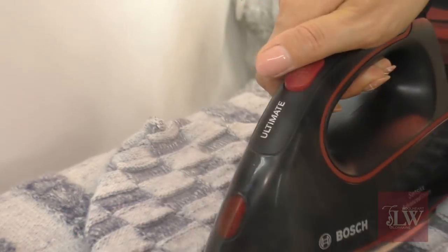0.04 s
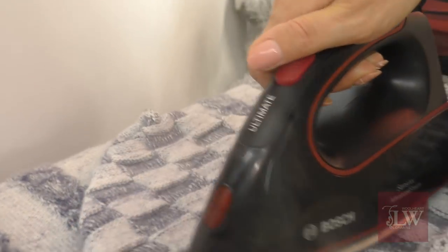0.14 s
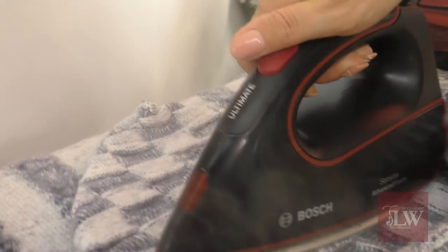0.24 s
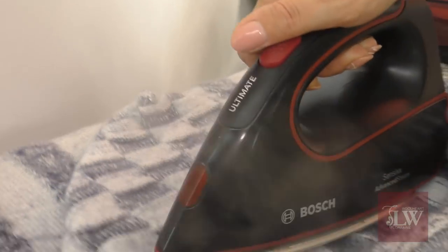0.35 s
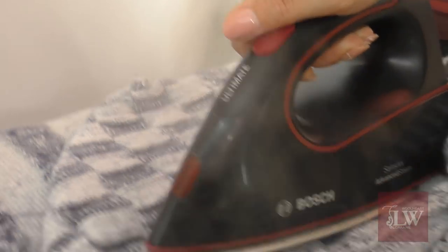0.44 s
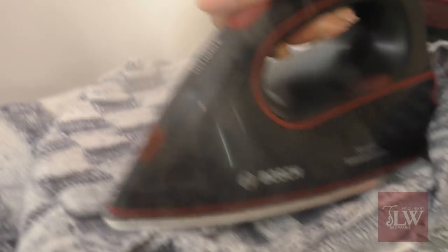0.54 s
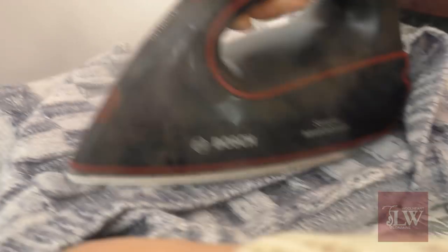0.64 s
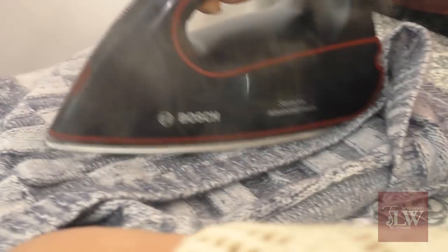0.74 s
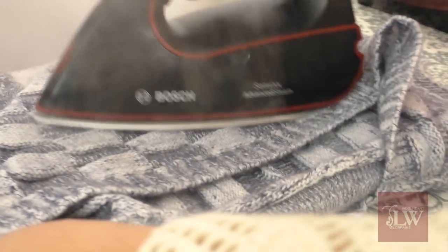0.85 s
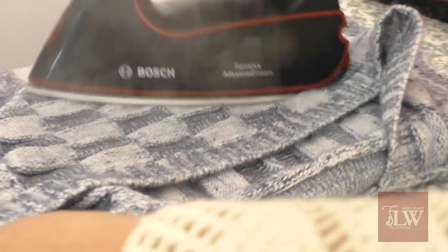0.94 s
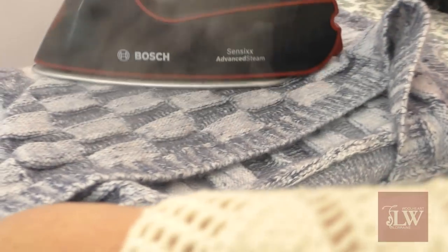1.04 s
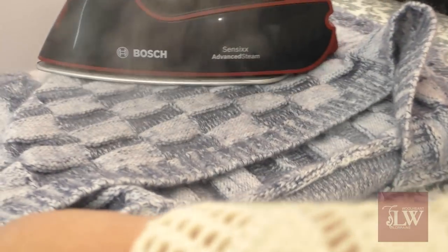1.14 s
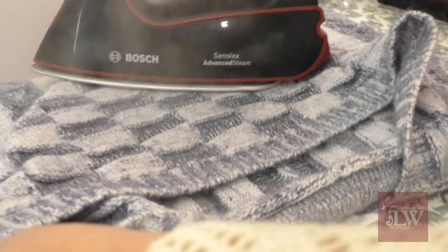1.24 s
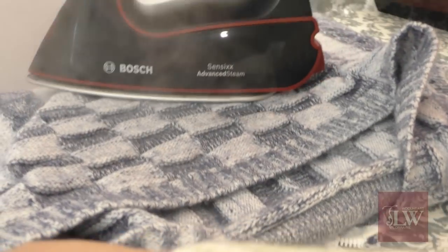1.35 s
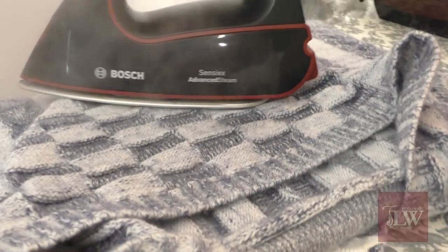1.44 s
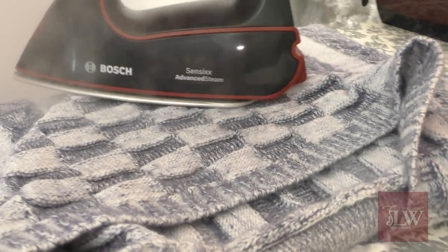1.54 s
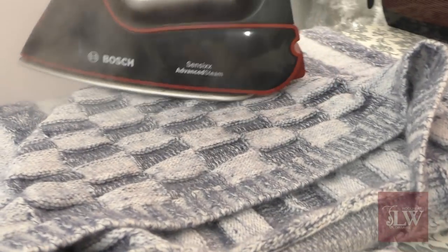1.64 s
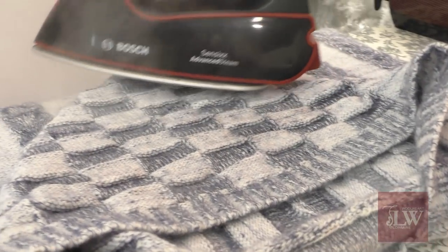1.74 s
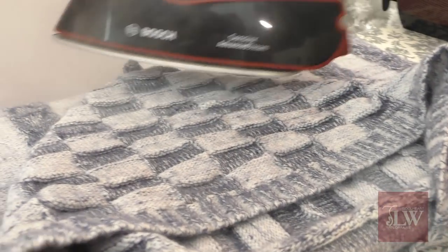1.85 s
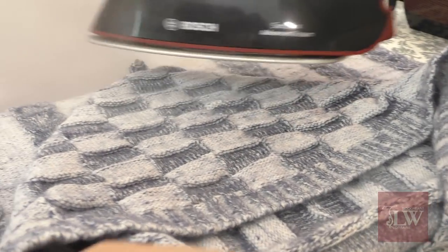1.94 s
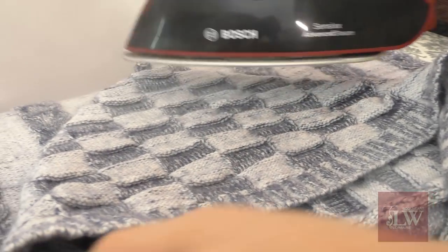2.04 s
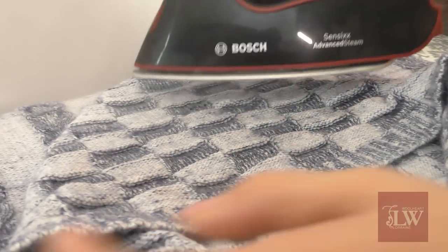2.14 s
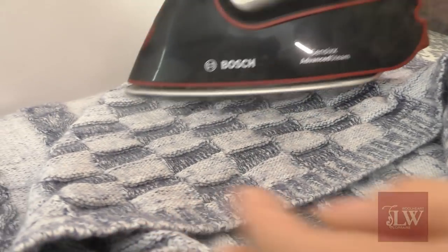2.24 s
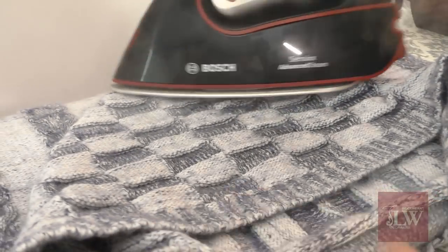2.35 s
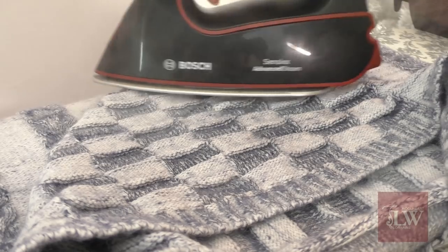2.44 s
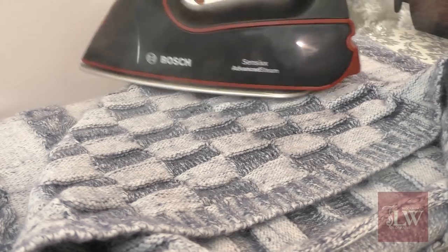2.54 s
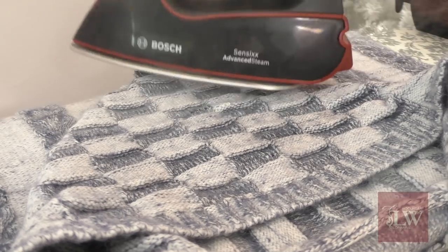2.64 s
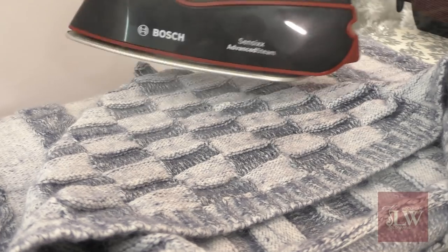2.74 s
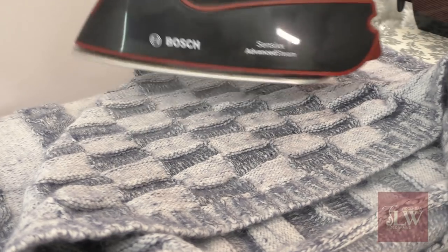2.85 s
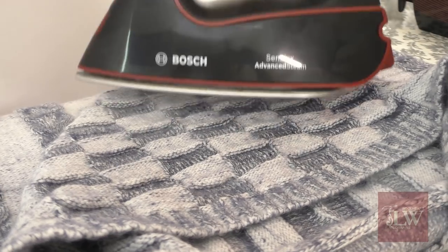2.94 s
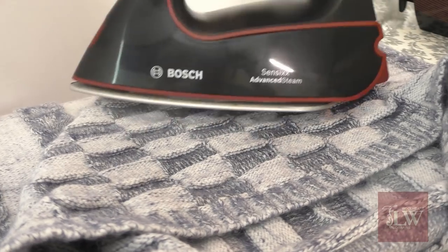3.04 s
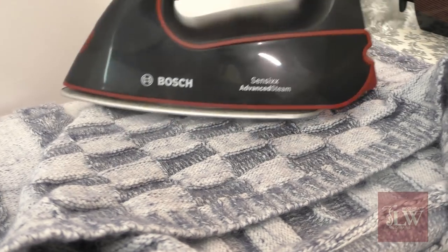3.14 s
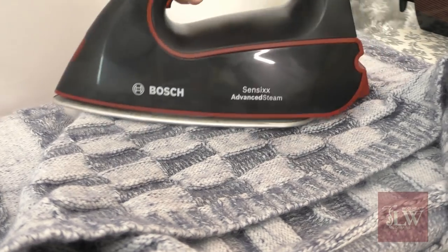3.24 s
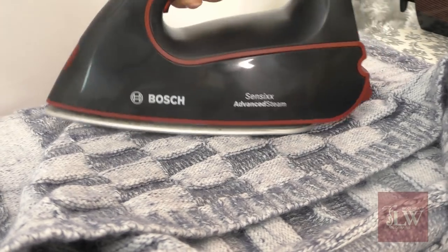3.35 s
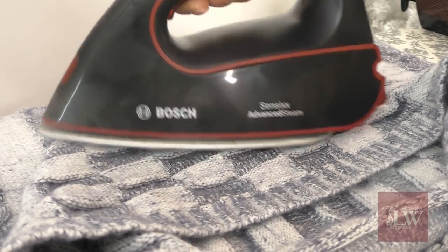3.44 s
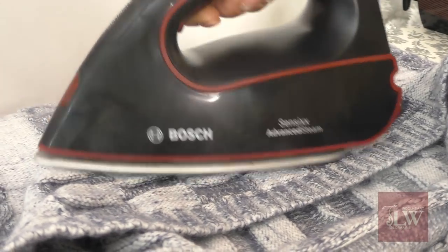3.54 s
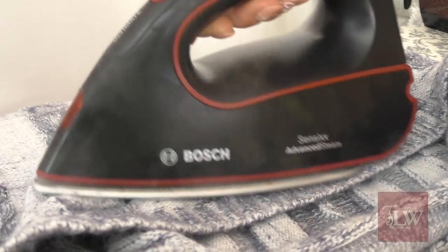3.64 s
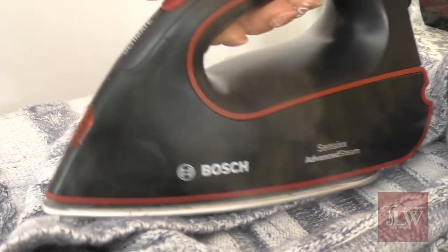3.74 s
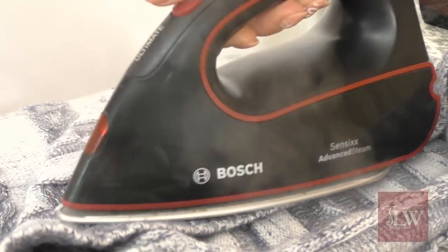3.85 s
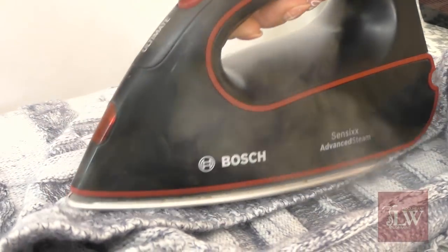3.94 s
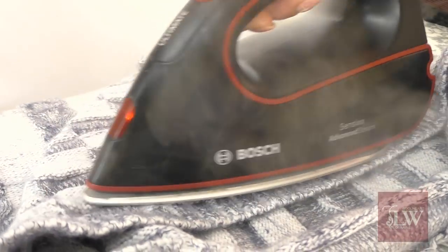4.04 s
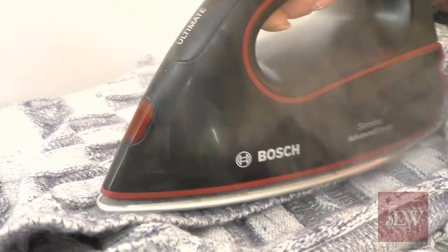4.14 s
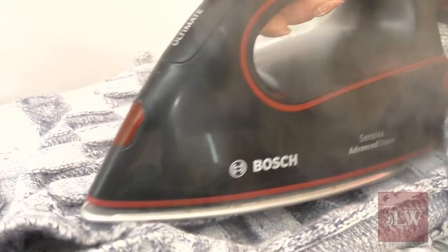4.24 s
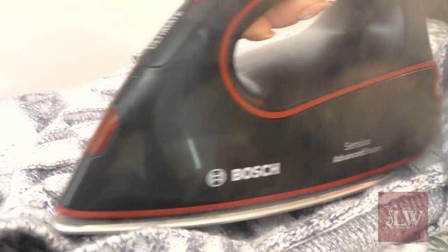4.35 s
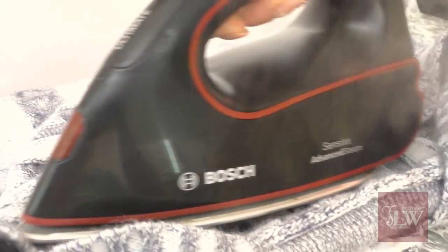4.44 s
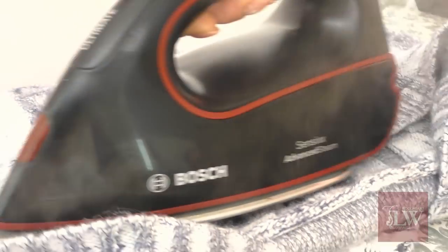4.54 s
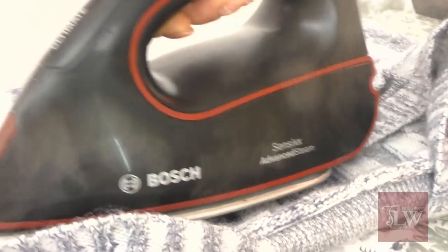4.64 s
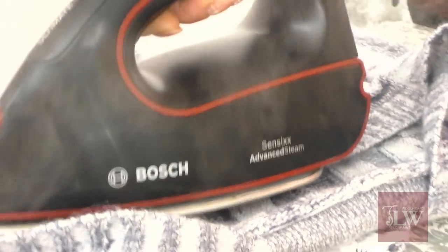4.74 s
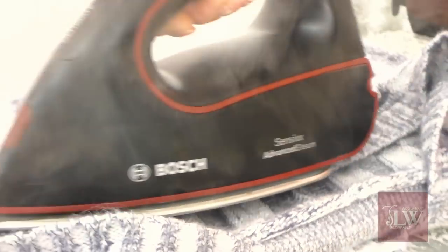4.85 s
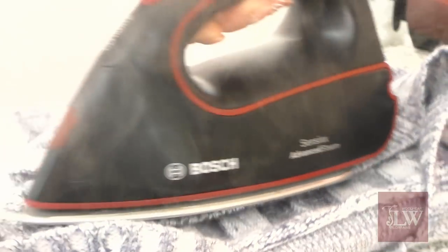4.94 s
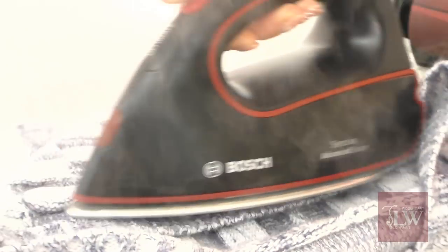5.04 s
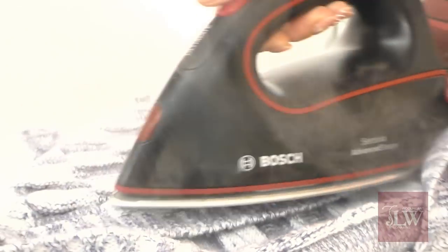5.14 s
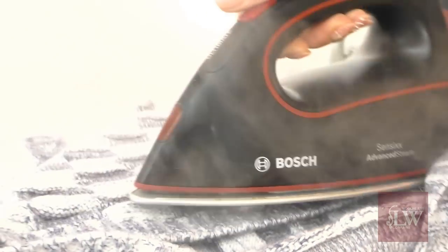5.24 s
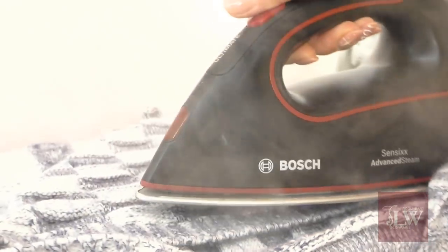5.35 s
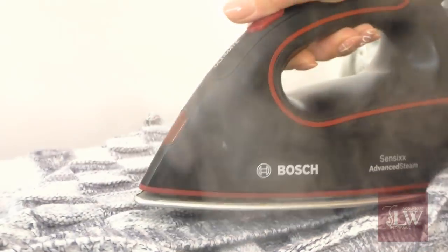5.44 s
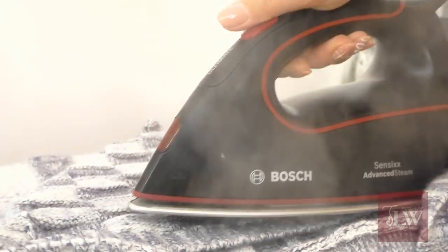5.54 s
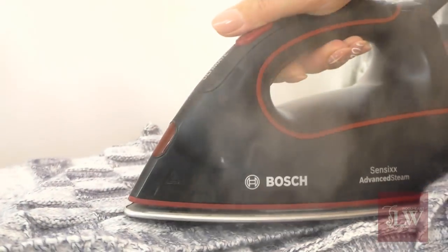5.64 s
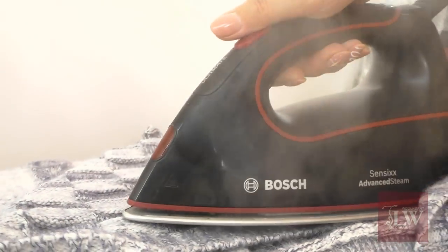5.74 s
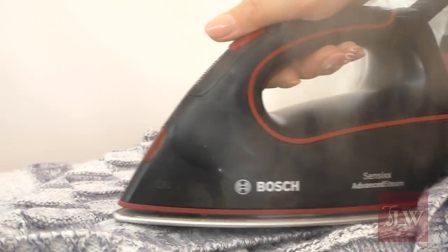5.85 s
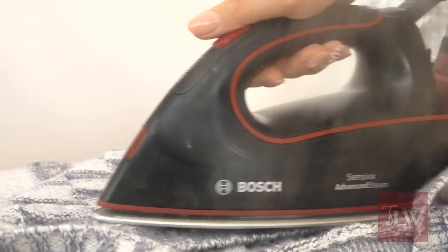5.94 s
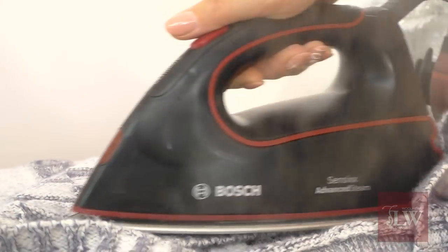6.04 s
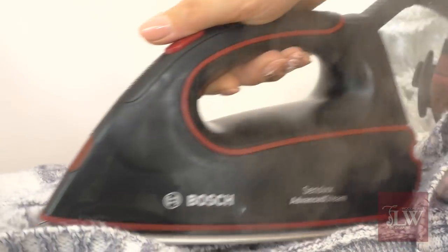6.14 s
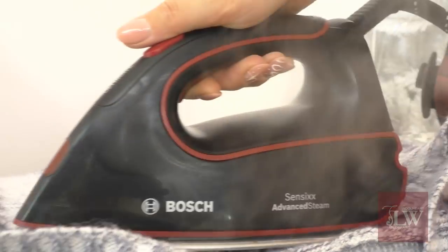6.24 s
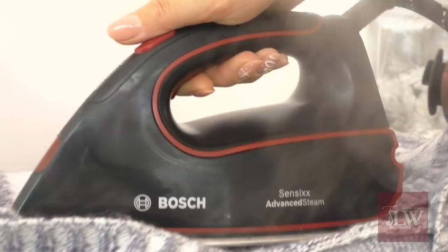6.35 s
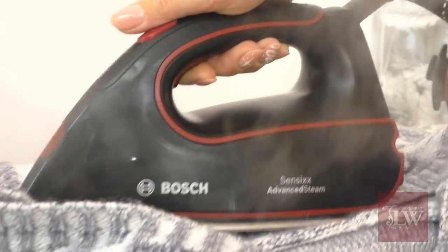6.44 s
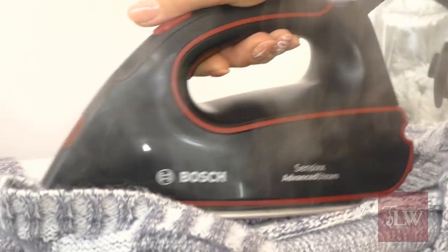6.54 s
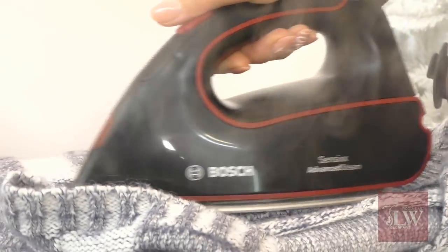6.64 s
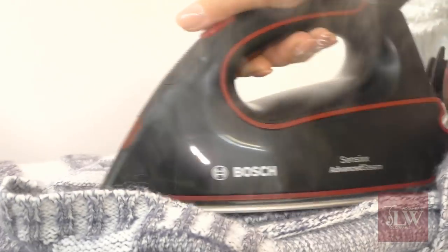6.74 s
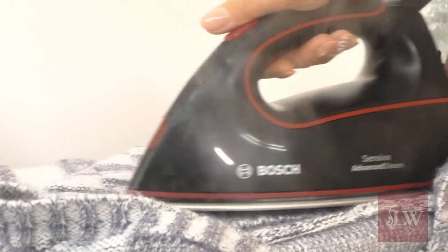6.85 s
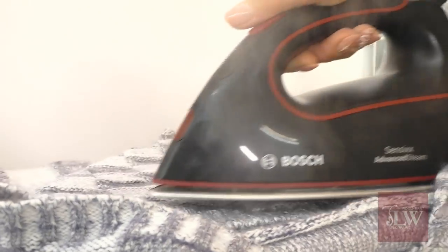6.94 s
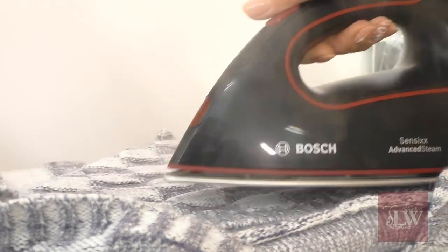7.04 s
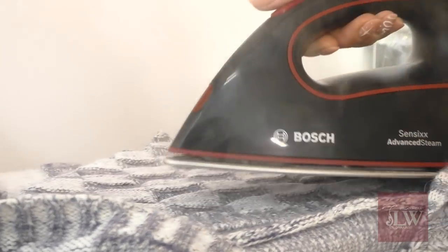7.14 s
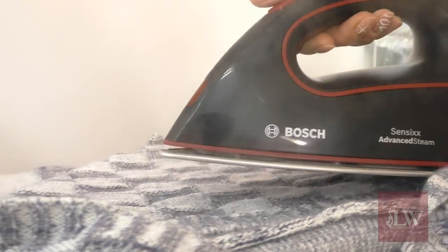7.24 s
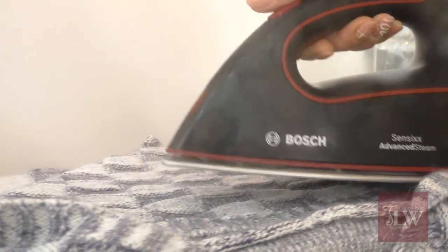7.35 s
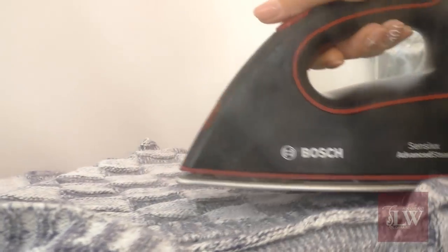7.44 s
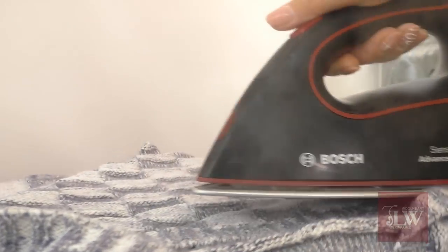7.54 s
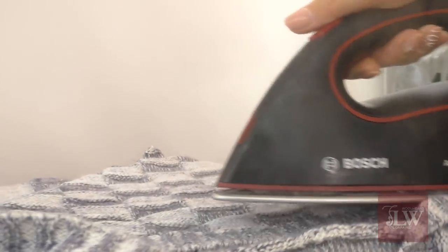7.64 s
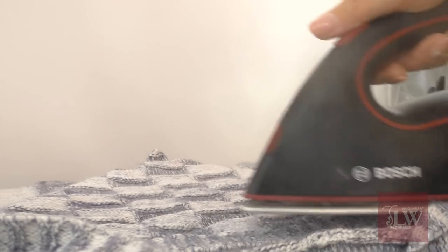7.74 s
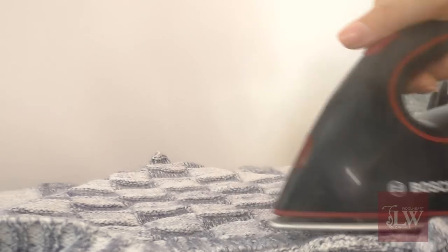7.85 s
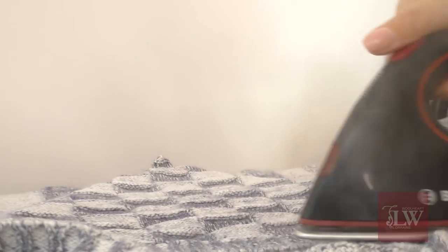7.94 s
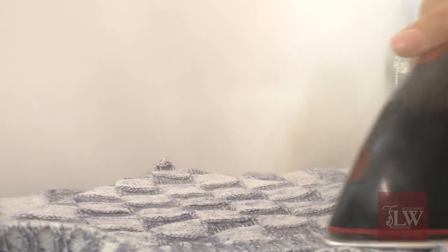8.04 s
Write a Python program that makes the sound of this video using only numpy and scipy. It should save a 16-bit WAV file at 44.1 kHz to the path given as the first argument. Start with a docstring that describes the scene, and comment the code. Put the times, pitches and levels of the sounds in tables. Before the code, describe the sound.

A steam iron is heard very close in stereo in a quiet room. From 0 s a dense, breathy hiss pours out, strongest in the upper mids, with hollow low air beneath. It dips around 0.9 s, then grows brighter and fizzier with a faint whistling edge from 1.5 s. At 1.76 s the trigger gives a crisp short click; at 1.9 s a soft low thud shuts the valve and the steam dies within about a quarter second. Faint room murmur, mains hum and slight woolly rustle remain. Two tiny creaking taps come at 3.11 and 3.15 s, a louder bright click at 3.18 s, and a dull pop with a quick spit at 3.31 s. Steam builds almost instantly and continues to 8 s, its colour sweeping as the iron moves, brighter near 4.7 s, with brief dips around 6.1 and 6.8 s and an airy treble lift near 7.3 s.

```python
"""Steam hisses from the sole plate of an iron hovering over a knitted blanket, close to a stereo camera.
The hiss is shaped noise in six parts; echoes off board and wool comb it as the iron moves.
The trigger clicks, the valve shuts with a thud and the steam fades to room tone and hum.
Two creaks, a click and a pop start the steam again; clicks and knocks are decaying modes with a noise crack."""
import sys
import numpy as np
from scipy import signal
from scipy.io import wavfile
from scipy.ndimage import uniform_filter1d

SR = 44100
rng = np.random.default_rng(int(sys.argv[2]) if len(sys.argv) > 2 else 0)


def transcribe(u):
    """Save the signal u as a 16-bit wav file named by the first command-line argument.

    u: samples, shape (n,) or (channels, n), limited to [-1, 1]; the rate is SR.
    q: integer samples, one column per channel.
    """
    v = np.clip(np.atleast_2d(u).T, -1, 1)
    q = np.round(v * 32767).astype(np.int16)
    wavfile.write(sys.argv[1], SR, q)


N = 356935  # samples
HOP = 256  # samples between steam frames
HZ = np.fft.rfftfreq(4 * HOP, 1 / SR)[:, None]
T = np.arange(N // HOP + 9) * HOP / SR  # frame times, s


def gain_of(db):
    """Decibels to amplitude."""
    return 10 ** (np.asarray(db) / 20)


def evened(x):
    """Scales to rms 1."""
    return x / np.sqrt(np.mean(x ** 2) + 1e-20)


def read(points, hz):
    """Reads a spectrum table on a log-frequency axis."""
    f, value = np.transpose(points)
    return np.interp(np.log(hz + 1), np.log(f + 1), value)


def follow(rows, t):
    """The columns of a time curve, read at times t."""
    s, *columns = np.transpose(rows)
    return [np.interp(t, s, c) for c in columns]


def humps(modes):
    """Bell-shaped lifts over frequency, from rows of centre Hz, width Hz and lift."""
    return sum(lift / (1 + (2 * (HZ - f) / width) ** 2) for f, width, lift in modes)


def noise(size, same, pan_db, hop):
    """Stereo noise whose short-time spectra have the given size; 'same' is the left-right likeness."""
    bins, frames = size.shape
    a, b, c, d = rng.standard_normal((frames, bins, 4)).T
    same = np.clip(same, -1, 1)
    left = a + 1j * b
    right = same * left + np.sqrt(1 - same ** 2) * (c + 1j * d)
    spectra = np.array([left, right]) * size * gain_of([pan_db / 2, -pan_db / 2])
    count = 2 * bins - 2
    sound = signal.istft(spectra, nperseg=count, noverlap=count - hop)[1]
    return sound[:, :N] * np.sqrt(count / hop / 3)


def echo(ms, strength, dull_hz, small_hz, sheen=0):
    """A delayed copy; wool swallows its treble, and bass bends round the small reflector."""
    treble_loss = sheen + (1 - sheen) / (1 + (HZ / dull_hz) ** 4)
    bass_loss = 1 + (small_hz / (HZ + 1)) ** 4
    return strength * treble_loss / bass_loss * np.exp(-2j * np.pi * HZ * ms / 1000)


# echo of the jets off the board, later as the iron draws away: start_s, delay_ms, strength (0-1)
BOARD_ECHO = [(0, 1.033, 0.45), (.8, 1.07, 0.17), (1.12, 0.78, 0.64), (1.74, 0.48, 0.43),
              (2.05, 0.757, 0.7), (3.37, 0.71, 0.3), (3.5, 0.92, 0.7), (3.8, 1.19, 0.27), (4.4, 1.32, 0.3),
              (5.0, 1.42, .2), (5.4, 1.41, 0.3), (6.0, 1.4, 0.36), (6.6, 1.3, 0.47), (7.0, 1.49, 0.27),
              (7.4, 1.46, 0.54), (8.09, 1.8, 0.2)]


def board_echo(sheen=0.7, blur_ms_per_s=0.15):
    """Reflection off the board; part of its treble survives (sheen), less while the delay slides fast."""
    delay_ms, strength = follow(BOARD_ECHO, T)
    speed = uniform_filter1d(abs(np.gradient(delay_ms, T)), size=40)
    return echo(delay_ms, strength, 4300., 1100., sheen / (1 + (speed / blur_ms_per_s) ** 2))


# echo off the folds of wool: start_s, delay_ms, strength (0-1)
FOLD_ECHO = [(0, .78, 0.08), (.75, 0.89, 0.15), (1.1, .5, 0.05), (1.3, 0.61, 0), (1.5, 0.22, 0.1),
             (1.74, .4, 0), (2.05, 0.38, 0.4), (3.5, .8, 0.22), (3.72, 0.88, 0.3), (4.6, 0.81, 0.1),
             (4.85, 0.64, 0), (5.2, 0.68, 0.3), (6.2, 0.63, 0.34), (6.45, 0.48, 0.04), (6.8, 0.65, 0.25),
             (7.25, 0.67, 0.27), (7.6, 0.61, 0.03), (7.8, .77, 0.16), (8.09, 0.77, 0.2)]


def fold_echo():
    """Reflection off the wool folds, with no treble sheen."""
    return echo(*follow(FOLD_ECHO, T), 4500., 900.)


# whistling resonances in the jets: centre_hz, width_hz, relative_level_db
WHISTLE_TONES = [(5350, 650, 6), (6900, 400, 0.5), (9600, 500, 1.5)]
# how strongly they sound: start_s, amount (0-1)
WHISTLE_AMOUNT = [(1.3, .2), (1.5, .6), (1.7, 0.54), (1.82, .3), (1.92, 1), (2.0, 0.42), (3.4, 0.087),
                  (4.6, 0.48), (5.0, 0.19), (8.09, 0.04)]


def whistle():
    """Narrow bands of the hiss that swell and sink together, as a weight over frequency and time."""
    tones = [(f, width, gain_of(db)) for f, width, db in WHISTLE_TONES]
    return humps(tones) * follow(WHISTLE_AMOUNT, T)[0]


# body of the hiss with the valve open: start_s, level_db
BODY_LEVEL = [(0, -27), (.55, -27), (.86, -33), (1.08, -30.5), (1.3, -31), (1.6, -27.5), (1.9, -30),
              (3.55, -27.5), (3.89, -29), (4.06, -26.5), (4.35, -26), (4.55, -29), (4.77, -27),
              (5.02, -29.5), (5.2, -27), (6.0, -27), (6.14, -31.5), (6.3, -27), (6.59, -27.5), (6.79, -32),
              (7.02, -25.5), (7.5, -27.5), (7.8, -25), (8.09, -28.5)]
# share of the body's power in its brighter half: start_s, share_db
BRIGHT_SHARE = [(0, -1.5), (.65, -2), (1.0, -5.5), (1.35, -0.7), (1.8, -6), (1.9, -3), (3.5, -5),
                (4.2, -2.5), (4.55, -5), (5.15, -3), (5.9, -2), (6.3, -7), (6.75, -6), (7.0, -4.5),
                (8.09, -4)]
# low hiss, strong near the wool, thin when the plate is lifted: start_s, hollow_db, rumble_db
LOW_LEVELS = [(0, -33, -39.5), (.8, -33, -40.5), (1.3, -32.5, -41), (1.56, -34, -35.5),
              (1.68, -39.5, -42.5), (1.9, -41, -45), (3.5, -32.5, -40), (4.2, -31, -43), (4.8, -33, -41),
              (5.5, -34, -42.5), (6.2, -29.5, -41), (6.9, -32, -39), (7.25, -36, -44), (8.09, -36.5, -43.5)]
# treble, strong when the plate is raised or turned to show its jets: start_s, fizz_db, top_fizz_db
TREBLE_LEVELS = [(0.05, -45, -48.5), (0.918, -49, -50.5), (1.012, -43.5, -49.5), (1.254, -46.5, -52),
                 (1.342, -42, -43.5), (1.594, -35.5, -43), (1.72, -38, -38), (1.8, -40, -44),
                 (1.89, -32, -37), (1.905, -33.5, -37), (3.55, -39.5, -43), (3.89, -46.5, -50),
                 (4.08, -43.5, -44), (4.61, -43.5, -44.5), (4.73, -36.5, -43), (5.05, -44.5, -49),
                 (5.34, -44.5, -41), (5.93, -43.5, -45.5), (6.14, -48, -54), (6.32, -42.5, -48.5),
                 (6.54, -42.5, -48.5), (6.83, -51, -54.5), (7.01, -44, -41.5), (7.31, -39.5, -35),
                 (7.48, -44, -39.5), (8.05, -44.5, -48)]
# how each part obeys the valve, rumble to top fizz: fade_db_per_s, opening_shortfall_db, opening_spit_db
VALVE_RESPONSE = [(105, 1.5, 4), (87, 8, 3), (112, 14, 5), (154, 8, -8), (253, 20, -4), (305, 13, 21.5)]


def part_levels(shut, start, build_s=0.087, spit_after_s=.008, spit_s=.012):
    """Part levels in dB: pose of the iron, fade after shutting, then spit of water and build-up on opening."""
    body, bright = follow(BODY_LEVEL, T)[0], follow(BRIGHT_SHARE, T)[0]
    hollow, rumble = follow(LOW_LEVELS, T)
    fizz, top_fizz = follow(TREBLE_LEVELS, T)
    dark = 10 * np.log10(1 - np.clip(gain_of(2 * bright), 0, .9))  # the rest of the body's power
    fade, shortfall, spit = np.transpose(VALVE_RESPONSE)[:, :, None]
    closing_db = -fade * np.maximum(T - shut, 0)
    since = np.maximum(T - start, 0)
    opening_db = spit * np.exp(-((since - spit_after_s) / spit_s) ** 2)
    opening_db -= shortfall * np.exp(-since / build_s)
    valve_db = np.where(T < (shut + start) / 2, closing_db, opening_db)
    return np.array([rumble, hollow, body + dark, body + bright, fizz, top_fizz]) + valve_db


# spectral shape of the jets, before each part is set to its level: pitch_hz, relative_level_db_per_hz
JET_SPECTRUM = [(40, -31), (100, -28.5), (250, -16), (580, -18.5), (830, -15.5), (970, -10.5), (1500, -8),
                (2600, -2.5), (3300, -3.5), (4400, -17), (5800, -20.5), (6500, -24.5), (9000, -19.5),
                (12000, -21.5), (16000, -37)]
# resonances of steam channels and microphone housing: centre_hz, width_hz, lift_db
CHANNEL_LIFTS = [(252, 30, 3), (335, 70, 5), (440, 50, 3), (685, 70, 5), (1120, 300, 4), (2300, 300, 2),
                 (2950, 400, 3), (5300, 800, 3), (7100, 400, 3), (8000, 400, 2), (9250, 400, 3),
                 (10600, 400, 1.5)]
# bands of rumble, hollow, dark body, bright body, fizz, top fizz: low_hz, high_hz
PART_BANDS = [(120, 800), (850, 1700), (1800, 2600), (2600, 4000), (4500, 8000), (8500, 15000)]
# stereo likeness of the hiss: pitch_hz, likeness (0-1)
STEAM_LIKENESS = [(60, 0.1), (150, 0.77), (380, 0.97), (950, 0.92), (2000, .9), (3500, 0.91), (5500, 0.88),
                  (7000, 1), (8500, 1), (11000, 0.89), (15000, 0.92)]
# where the iron is across the picture, before the per-band weight: start_s, left_minus_right_db
IRON_PAN = [(0.05, 0.0), (0.606, 1.0), (0.786, 2), (1.744, 4.5), (1.9, 3.5), (3.5, 2.5), (3.58, 3),
            (4.34, 1), (4.73, 5), (5.26, 0.5), (6.03, 0.5), (6.33, 2), (6.63, 3), (6.96, 0.5), (8.05, -1)]
# per-band weight of that pan: pitch_hz, share
PAN_SHARE = [(300, .05), (1300, .1), (2000, 1.1), (5500, 1.1), (7000, .1), (8500, .3), (11000, 1.0),
             (15000, .4)]


def steam(patchy_db=1.0, flicker_db=0.71, whistle_db=6.5, drain_s=.26):
    """Turbulent jets: one spectrum, combed by echoes, whose parts rise and fall with the pose of the iron."""
    comb = abs((1 + board_echo()) * (1 + fold_echo()))
    jets_db = read(JET_SPECTRUM, HZ) + humps(CHANNEL_LIFTS) + whistle_db * whistle()
    shape = comb * gain_of(jets_db)
    bands = [(HZ[:, 0] > lo) & (HZ[:, 0] < hi) for lo, hi in PART_BANDS]
    part_db = [10 * np.log10((shape[band] ** 2).sum(0)) for band in bands]
    shut, start = SHUT_KNOCK[0][0], POP_KNOCK[0][0] - .003
    levels = part_levels(shut, start) - part_db
    # crossfade from part to part between the band middles
    middles = np.sqrt(np.prod(PART_BANDS, axis=1))
    weights = np.eye(len(PART_BANDS))
    blend = np.hstack([read(np.transpose([middles, row]), HZ) for row in weights])
    field_db = blend @ levels
    # turbulence: small drifting patches, and a flicker shared over wide bands
    patches, flicker = rng.standard_normal((len(T), len(HZ), 2)).T
    patches = uniform_filter1d(uniform_filter1d(patches, size=8, axis=0), size=30, axis=1)
    flicker = uniform_filter1d(uniform_filter1d(flicker, size=120, axis=0), size=8, axis=1)
    field_db += patchy_db * evened(patches) + flicker_db * evened(flicker)
    # the last steam drains away by drain_s after shutting; opening takes 3.1 ms
    t = np.arange(N) / SR
    valve = np.clip(np.maximum((shut + drain_s - t) / .14, (t - start) / 0.0031), 0, 1)
    pan_db = follow(IRON_PAN, T)[0] * read(PAN_SHARE, HZ)
    return valve * noise(shape * gain_of(field_db), read(STEAM_LIKENESS, HZ), pan_db, HOP)


# mains hum, before a small stereo tilt: pitch_hz, rms_db
MAINS_HUM = [(50, -70.5), (150, -70), (250, -69), (300, -70), (350, -73)]


def mains_hum():
    """Steady sines at mains harmonics, a little louder at left and 0.15 cycle ahead at right."""
    t, lead = np.arange(N) / SR, np.array([[0], [.15]])
    hum = sum(np.sqrt(2) * gain_of(db) * np.sin(2 * np.pi * (f * t + rng.random() + lead))
              for f, db in MAINS_HUM)
    return hum * gain_of([[.8], [-.8]])


# room tone and faint simmer of the idle iron, with the rustle of wool in the treble:
# start_s, level_db, rustle_db, rustle_left_minus_right_db
IDLE_LEVELS = [(2.15, -50.5, 1.5, -3), (2.662, -52.5, -1, 1.5), (3.068, -49.5, 1, -0.5),
               (3.186, -51, 1, 1.0), (3.3, -55, 1, -2.0)]
# shape of the murmur, before it is set to its level: pitch_hz, relative_level_db_per_hz
ROOM_SPECTRUM = [(20, -20), (50, -12), (85, -11.5), (150, -1.5), (270, -6.5), (400, -6), (580, -21.5),
                 (700, -15), (830, -18.5), (1000, -10.5), (1400, -9), (2400, -13.5), (4500, -30.5),
                 (16000, -31)]
# stereo likeness of the murmur: pitch_hz, likeness (0-1)
ROOM_LIKENESS = [(40, .4), (100, 0.5), (240, 0.78), (950, 0.87), (3770, 0.6), (15000, 0.75)]


def room_tone():
    """Low murmur of the house and boiler with steady bass, shifting simmer and a little rustle on top."""
    hz, t = np.fft.rfftfreq(2048, 1 / SR)[:, None], np.arange(N // 512 + 5) * 512 / SR
    level_db, rustle_db, pan_db = follow(IDLE_LEVELS, t)
    treble = 1 / (1 + (2500.0 / (hz + 1)) ** 4)
    above_bass = 1 / (1 + (130.0 / (hz + 1)) ** 4)
    shape = gain_of(read(ROOM_SPECTRUM, hz))
    shape /= np.linalg.norm(shape[(hz > 100) & (hz < 3000)])
    steady_db = np.median(level_db)
    size_db = steady_db + (level_db - steady_db) * above_bass + rustle_db * treble
    return noise(shape * gain_of(size_db), read(ROOM_LIKENESS, hz), pan_db * treble, hop=512)


def knocks(events, modes, rise_s, crack_db, tail_db, tail_t60):
    """Each knock cracks and rings its modes; nearby walls return its front as a short diffuse tail."""
    t, out = np.arange(SR // 3) / SR, np.zeros((2, N + SR))
    for s, db, pan_db in events:
        ring = sum(-gain_of(d - 60 * t / t60) * np.sin(2 * np.pi * f * t) for f, d, t60 in modes)
        crack = signal.lfilter([1, 0, -1], 1, rng.standard_normal(len(t)))  # mid and treble only
        crack *= gain_of(crack_db - 60 * t / 0.011)
        knock = (ring / abs(ring).max() + crack) * np.clip(t / rise_s, 0, 1)
        knock /= abs(knock).max()
        front = knock * np.exp(-t / rise_s)
        # the reflections start after 6 ms and differ partly between the channels
        taps = rng.standard_normal((2, len(t))) * (t > .006) * gain_of(-60 * t / tail_t60)
        taps = taps[0] + .5 * taps * [[0], [1]]
        taps /= np.linalg.norm(taps[0])
        tail = signal.fftconvolve(front[None], taps, axes=1)[:, :len(t)]
        gain = gain_of(db + np.array([[pan_db], [-pan_db]]) / 2)
        out[:, round(s * SR):][:, :len(t)] += gain * (knock + gain_of(tail_db) * tail)
    return out[:, :N]


# trigger switch, peak before pan and tail: start_s, peak_db, left_minus_right_db
SWITCH_CLICKS = [(1.7630, -18, 0), (3.1833, -12, 2.5)]
# its ringing modes: pitch_hz, relative_level_db, t60_s
SWITCH_MODES = [(1700, -5, .008), (2500, 2, 0.0054), (3520, 3, 0.0089), (4140, 1, 0.0085),
                (6200, -2, 0.0046), (8700, 5, 0.0082), (10000, 0, 0.0085), (10900, -1, 0.011),
                (11900, -9, 0.0055), (13900, -13, .005)]


def switch_clicks():
    """The trigger switch snaps, ringing bright, short modes."""
    return knocks(SWITCH_CLICKS, SWITCH_MODES, rise_s=.0005, crack_db=-20, tail_db=-6, tail_t60=0.16)


# valve shutting, peak before pan and tail: start_s, peak_db, left_minus_right_db
SHUT_KNOCK = [(1.91, -26.5, 0.0)]
# its ringing modes: pitch_hz, relative_level_db, t60_s
SHUT_RING = [(203, -1, 0.24), (452, 1, 0.07), (672, -5, 0.084)]


def valve_thud():
    """The shutting valve rings low modes with a soft front."""
    return knocks(SHUT_KNOCK, SHUT_RING, rise_s=.0045, crack_db=-30, tail_db=-6, tail_t60=.15)


# finger taking up the trigger, peak before pan and tail: start_s, peak_db, left_minus_right_db
TRIGGER_CREAKS = [(3.11, -31.5, 2), (3.145, -35.5, 0.0)]
# its ringing modes: pitch_hz, relative_level_db, t60_s
TRIGGER_MODES = [(350, -1, .015), (1020, -0.5, 0.02), (1490, 6, 0.013), (2300, -6, .007), (3500, -10, .004),
                 (5000, -10, .004)]


def trigger_creaks():
    """The trigger gives quiet taps with quickly damped modes as the finger takes it up."""
    return knocks(TRIGGER_CREAKS, TRIGGER_MODES, rise_s=.0005, crack_db=-28, tail_db=-2, tail_t60=.1)


# valve opening, peak before pan and tail: start_s, peak_db, left_minus_right_db
POP_KNOCK = [(3.3114, -23.5, .5)]
# its ringing modes: pitch_hz, relative_level_db, t60_s
POP_RING = [(117, -12.5, 0.14), (191, -5, 0.099), (258, 7.5, 0.034), (324, -4, 0.082), (424, -4.5, 0.057)]


def valve_pop():
    """The opening valve pops with short low modes and a soft front."""
    return knocks(POP_KNOCK, POP_RING, rise_s=.0045, crack_db=-32, tail_db=-3, tail_t60=0.21)


def scene():
    """Steam, room tone and hum, and the mechanics of trigger and valve."""
    background = room_tone() + mains_hum()
    mechanics = switch_clicks() + valve_thud() + trigger_creaks() + valve_pop()
    return steam() + background + mechanics


def record(dry):
    """The band limit of the recorder: a steep low-pass at 15.7 kHz."""
    low_pass = signal.firwin(511, 15700, window=("kaiser", 9), fs=SR)
    return signal.oaconvolve(dry, low_pass[None], "same")


dry = scene()
out = record(dry)
transcribe(out)
```